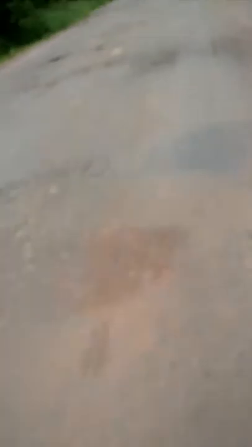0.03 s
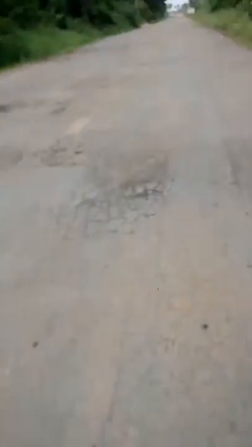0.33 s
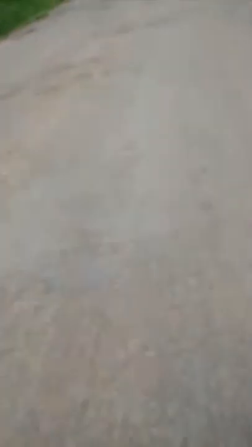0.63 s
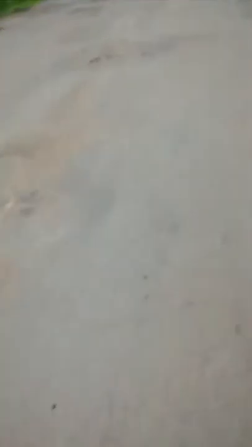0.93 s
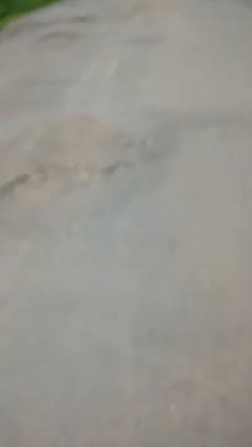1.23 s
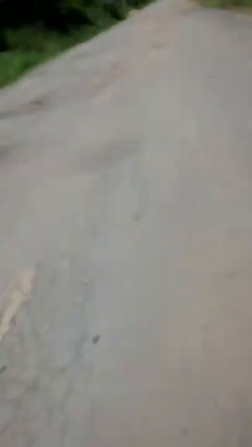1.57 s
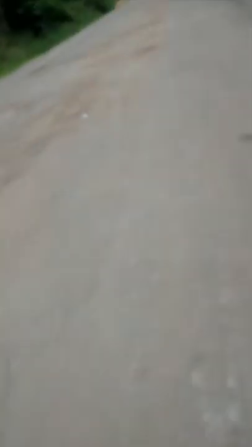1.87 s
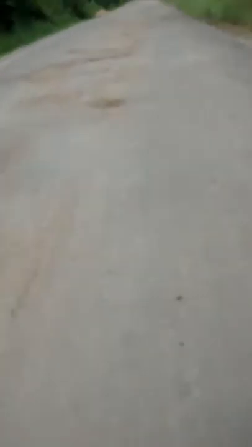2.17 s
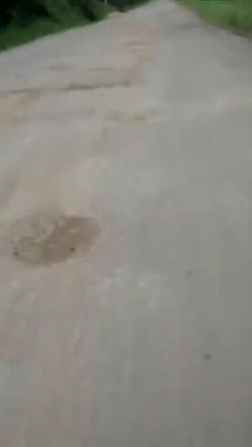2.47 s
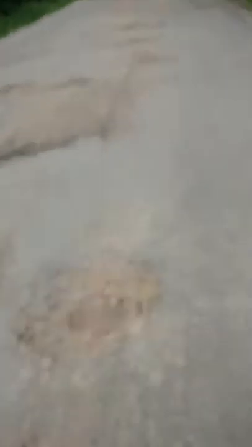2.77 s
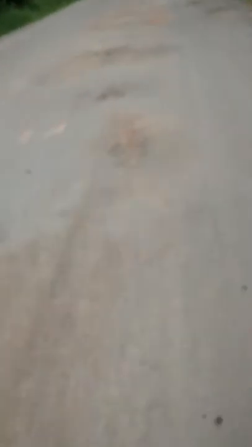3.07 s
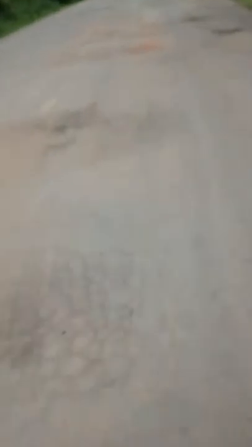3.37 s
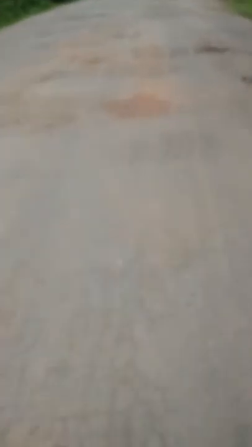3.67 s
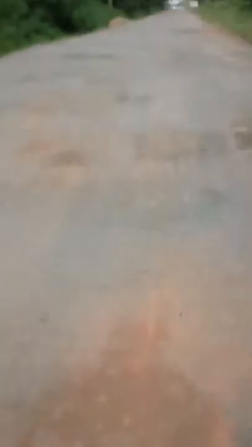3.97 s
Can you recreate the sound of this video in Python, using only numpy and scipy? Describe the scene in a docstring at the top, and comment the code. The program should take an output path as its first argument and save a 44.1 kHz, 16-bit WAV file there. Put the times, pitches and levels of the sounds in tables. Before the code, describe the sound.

Riding in the open air on a rough road, a high, unsteady whistle sounds, turns to brief chirps, then returns in longer stretches. Wind buffets the microphone throughout, over deep road rumble, an engine hum and faint ticks.

```python
"""On a rough road, riding in the open air. Turbulent wind and road noise rumble and roar over a low
engine hum; the strongest buffets overload the microphone, and small ticks come through.
Air streaming over a narrow gap whistles as an edge tone: its pitch wavers with the airspeed,
and it breaks off whenever the jet loses the edge."""
import sys
import numpy as np
from scipy import signal
from scipy.fft import rfft, irfft
from scipy.io import wavfile
from scipy.ndimage import uniform_filter1d

SR = 44100
rng = np.random.default_rng(int(sys.argv[2]) if len(sys.argv) > 2 else 0)


def transcribe(signal):
    """Save signal, clipped to [-1, 1], as a 16-bit WAV file at the path in sys.argv[1]."""
    frames = np.atleast_2d(signal).T
    limited = np.clip(frames, -1, 1)
    pcm = np.round(limited * 32767).astype(np.int16)
    wavfile.write(sys.argv[1], SR, pcm)


N = 176400
TIME, FREQ = np.arange(N) / SR, np.maximum(np.arange(N // 2 + 1) * SR / N, 1)
ROAD_LAG_S = 0.00043   # road and engine reach the left microphone port later and with opposite sign


def from_db(db):
    """Amplitude grows tenfold with every 20 dB."""
    return 10 ** (np.asarray(db) / 20)


def in_time(rows):
    """Linear interpolation of a curve over time."""
    return np.interp(TIME, *np.transpose(rows))


def over_hz(rows):
    """Linear interpolation of each column over log frequency."""
    hz, *columns = np.transpose(rows)
    return np.array([np.interp(np.log(FREQ), np.log(hz), column) for column in columns])


def swells(rows, width_s):
    """Gaussian rises and dips of level, in dB."""
    return sum(db * np.exp(-((TIME - s) / width_s) ** 2) for s, db in rows)


def drift(rate_hz):
    """Low-passed noise: a smooth random fluctuation of unit variance."""
    slow = irfft(rfft(rng.standard_normal(N)) / (1 + (FREQ / rate_hz) ** 2), N)
    return (slow - slow.mean()) / slow.std()


# Hums of engine and drive. Each row: frequency in Hz, level in dB before the load changes, and after.
ENGINE_HUMS = [(65.26, -20.5, -24), (128.4, -23, -20), (410, -36, -24.5), (768, -51, -37.5)]


def engine(load_change_s=2.77, fade_s=0.17, whine_start_s=3.3, whine_hz=1101, sag_hz_per_s=62):
    """Rotation radiates tones that wander with speed and shift in level with load; a thin whine sinks."""
    running_s = np.cumsum(1 + 0.00892 * drift(5.46)) / SR
    changed = np.clip((TIME - load_change_s) / fade_s + .5, 0, 1)
    hum = np.zeros(N)
    for hz, before_db, after_db in ENGINE_HUMS:
        level_db = before_db + (after_db - before_db) * changed + 3.5 * drift(11)
        hum += from_db(level_db) * np.sin(2 * np.pi * hz * running_s)
    whine_s = np.maximum(running_s - whine_start_s, 0)
    whine_cycles = whine_hz * whine_s - sag_hz_per_s * whine_s ** 2 / 2
    hum += from_db(-32) * np.minimum(whine_s / fade_s, 1) * np.sin(2 * np.pi * whine_cycles)
    left = -from_db(-5.5) * np.interp(TIME - ROAD_LAG_S, TIME, hum)
    return np.array([left, hum])


# Sharp ticks. Each row: start in seconds, relative level in dB.
TICK_ONSETS = [(0.186, -49), (0.2528, -43), (0.3181, -45), (0.4492, -43), (0.4875, -42), (0.8131, -34.5),
               (1.078, -40.5), (1.1741, -41), (1.212, -36.5), (1.3653, -40.5), (1.5633, -46), (1.6721, -39),
               (1.721, -39.5), (2.7148, -40), (2.975, -42), (3.0125, -43), (3.0463, -39), (3.0897, -37.5),
               (3.6513, -37)]


def ticks(gain_db=23, decay_s=0.0011, pan_db=3.5):
    """Exponentially damped noise bursts are heard as tiny dry cracks, stronger on the right."""
    envelope = sum(from_db(db + gain_db) * (TIME >= s) * np.exp(-np.abs(TIME - s) / decay_s)
                   for s, db in TICK_ONSETS)
    bursts = envelope * rng.standard_normal((2, N))
    lowpass = signal.butter(1, 2500, fs=SR, output="sos")
    return signal.sosfilt(lowpass, bursts + 1e-18) * from_db([[-pan_db], [pan_db]])


# Base spectrum of wind and road. Each row: frequency in Hz, left and right density in dB per Hz.
ROAD_DENSITY = [(20, -28.5, -29), (45, -34.5, -30.5), (92, -36.5, -34), (151, -42, -39), (295, -46, -43.5),
                (387, -47, -42.5), (546, -50, -46), (674, -61.5, -54.5), (796, -58, -54.5),
                (1070, -60, -55), (1210, -60.5, -58), (1460, -59.5, -54), (1637, -63.5, -57.5),
                (1806, -71, -63.5), (2020, -74.5, -70.5), (2400, -72, -69.5), (2870, -80, -76),
                (3120, -78.5, -73.5), (4440, -80, -70), (5230, -84.5, -84.5), (6600, -84.5, -84),
                (7750, -88.5, -90.5), (8950, -92, -90), (9700, -99.5, -96.5), (14500, -104, -102)]
# Resonances of the vehicle's hollows. Each row: centre in Hz, width in Hz, lift in dB.
CAVITY_MODES = [(394, 28, 3), (885, 20, 6.5), (1397, 60, 4.5)]
# Coherence of the two ports. Each row: frequency in Hz, shared fraction of the power.
PORT_COHERENCE = [(30, 0.96), (350, 0.95), (560, 0.89), (900, 0.92), (1500, 0.96), (2000, 0.82),
                  (2600, 0.99), (4500, 0.48), (8000, 0)]


def road_spectrum():
    """Cavity resonance colours broadband turbulence, which is partly coherent between the ports."""
    share = np.clip(over_hz(PORT_COHERENCE)[0], 0, 1)
    ports = np.array([-np.exp(-2j * np.pi * FREQ * ROAD_LAG_S), np.ones(len(FREQ))])
    common = np.sqrt(share) * ports * rfft(rng.standard_normal(N))
    separate = np.sqrt(1 - share) * rfft(rng.standard_normal((2, N)))
    lift_db = sum(db / (1 + (2 * (FREQ - hz) / width) ** 2) for hz, width, db in CAVITY_MODES)
    colour = from_db(over_hz(ROAD_DENSITY) + lift_db) * np.sqrt(SR / 2)
    highpass = FREQ / np.hypot(FREQ, 10)
    return (common + separate) * colour * highpass


# Slow course of the roar and hiss. Each row: time in seconds, gain in dB.
ROAR_TREND = [(0, 0.4), (.8, 1.66), (1.85, 1.1), (2.5, 1), (3.1, -1.15), (4, -1.1)]
# Short gusts and lulls. Each row: centre in seconds, gain in dB.
GUSTS_AND_LULLS = [(.14, 1.5), (.46, 3), (1.615, 2.5), (1.785, -4), (2.15, 2.5), (3.21, -2)]
# Jolts and buffets that swell the deep rumble. Each row: centre in seconds, gain in dB.
DEEP_JOLTS = [(1.37, 4.5), (1.715, 6), (2.005, 4.5), (2.71, 5), (3.02, 3), (3.71, 3.5)]


def wind_and_road(jolt_top_hz=170, roar_low_hz=470, hiss_low_hz=2230):
    """Gusts and jolts modulate the amplitude of turbulent noise: low rumble, midrange roar, thin hiss."""
    spectrum = road_spectrum()
    deep, below_roar, below_hiss = (1 / (1 + (FREQ / hz) ** 8)
                                    for hz in (jolt_top_hz, roar_low_hz, hiss_low_hz))
    gust_db = swells(GUSTS_AND_LULLS, width_s=0.052)
    roar_db = in_time(ROAR_TREND) + gust_db
    jolted = irfft(spectrum * deep, N) * from_db(swells(DEEP_JOLTS, width_s=0.036))
    upper_rumble = irfft(spectrum * (below_roar - deep), N)
    rumble = (jolted + upper_rumble) * from_db(gust_db + 0.73 * drift(23))
    roar = irfft(spectrum * (below_hiss - below_roar), N) * from_db(roar_db - 1.65 + drift(14))
    hiss = irfft(spectrum * (1 - below_hiss), N) * from_db(roar_db - 0.5 + 2.05 * drift(27))
    return rumble + roar + hiss


def rasp(grains_per_s=140, relative_db=-42.5):
    """Shot noise: the jet spits sparse random impulses, at a level relative to its tone."""
    impulses = (rng.random((2, N)) < grains_per_s / SR) * rng.standard_normal((2, N))
    band = signal.butter(1, [3500, 6200], "band", fs=SR, output="sos")
    grains = signal.sosfilt(band, impulses + 1e-18)
    return from_db(relative_db) * grains / grains.std()


# Pitch of the edge tone, following the airspeed at the gap. Each row: time in seconds, pitch in Hz.
EDGE_TONE_PITCH = [(0.0, 3050), (0.036, 2980), (0.108, 3560), (0.126, 3300), (0.166, 3734), (0.198, 3570),
                   (0.223, 3295), (0.257, 3690), (0.285, 3440), (0.299, 2950), (0.321, 2940), (0.347, 3510),
                   (0.389, 3087), (0.423, 3530), (0.447, 3660), (0.473, 3430), (0.493, 3170), (0.501, 3490),
                   (0.547, 3800), (0.569, 3610), (0.627, 3760), (0.71, 3170), (0.746, 3060), (0.756, 3330),
                   (0.803, 3550), (0.864, 3300), (0.902, 3690), (0.956, 3000), (0.976, 3225), (0.994, 3746),
                   (1.054, 3630), (1.096, 3800), (1.121, 3450), (1.139, 3660), (1.161, 3630), (1.187, 3805),
                   (1.227, 3574), (1.273, 3610), (1.293, 3817), (1.369, 3580), (1.381, 3824), (1.459, 3576),
                   (1.497, 3840), (1.539, 3810), (1.558, 3750), (1.574, 3540), (1.682, 3760), (1.692, 3510),
                   (1.732, 3690), (1.742, 3504), (1.833, 3730), (1.846, 4350), (1.852, 3890), (1.872, 3777),
                   (1.95, 3914), (1.956, 3565), (1.978, 3716), (2.135, 3544), (2.354, 3410), (2.367, 3650),
                   (2.373, 4000), (2.44, 3510), (2.542, 3620), (2.551, 3260), (2.558, 3600), (2.716, 3780),
                   (2.731, 3250), (2.736, 3570), (2.75, 3740), (2.768, 3630), (2.814, 3614), (2.818, 4045),
                   (2.832, 3760), (2.947, 3690), (2.987, 3570), (3.019, 3870), (3.027, 3680), (3.061, 3500),
                   (3.073, 3670), (3.111, 3900), (3.159, 3430), (3.263, 3510), (3.324, 3220), (3.362, 3500),
                   (3.368, 3300), (3.386, 3615), (3.41, 3370), (3.444, 3510), (3.462, 3210), (3.504, 3045),
                   (3.518, 3335), (3.554, 3050), (3.578, 3297), (3.63, 3140), (3.64, 3320), (3.662, 3040),
                   (3.921, 3135), (3.945, 2884), (3.999, 3250)]
# Spells in which the jet holds the edge. Each row: start and end in seconds, relative level in dB.
EDGE_TONE_SPELLS = [(-.02, 0.057, -2.5), (0.058, 0.21, 0.5), (0.212, 0.258, -3), (0.281, 0.346, -6),
                    (0.393, 0.998, -1.5), (0.997, 1.495, 0.5), (1.526, 1.571, 0.5), (1.641, 1.659, -4),
                    (1.683, 1.69, -4), (1.733, 1.756, -4.5), (1.831, 1.898, -1), (1.950, 1.991, -0.5),
                    (2.136, 2.144, 0.5), (2.354, 2.37, -1.5), (2.427, 2.465, -0.5), (2.529, 2.579, 0),
                    (2.706, 2.832, 0.5), (2.95, 3.123, 0.5), (3.152, 3.209, -4.5), (3.260, 3.264, -6.5),
                    (3.315, 3.473, -1), (3.473, 3.668, -2), (3.899, 4.02, -1.5)]


def whistle(tone_db=-15.5, full_speed_hz=3620, attack_s=0.0036, release_s=0.0094, settle_s=0.05):
    """Edge tone: a jet oscillating across an edge sounds a near sine that catches and drops abruptly."""
    held = np.zeros(N)
    for start, end, db in EDGE_TONE_SPELLS:
        attack = np.clip((TIME - start) / attack_s + .5, 0, 1)
        release = np.clip((end - TIME) / release_s + .5, 0, 1)
        held += from_db(db) * attack * release
    # A fast jet that has only just caught the edge warbles and sputters; slow air catches cleanly.
    pole = np.exp(-1 / (settle_s * SR))
    settled = signal.lfilter([1 - pole], [1, -pole], np.sign(held))
    pitch = in_time(EDGE_TONE_PITCH)
    overblown = np.minimum(pitch / full_speed_hz, 1) ** 10
    unsteady = overblown * (1 - settled)
    # Turbulence shakes both pitch and level.
    waver_hz, shake_db = 32.2 + 65 * unsteady, 0.8 + 0.5 * unsteady
    hz = pitch + waver_hz * drift(135)
    level_db = tone_db + shake_db * drift(84)
    envelope = uniform_filter1d(held, size=90) * from_db(level_db)
    lead_s = [0.0005484, 0]   # the left port hears the tone first
    left_phase, right_phase = 2 * np.pi * (np.cumsum(hz) / SR + np.outer(lead_s, hz))
    octave = from_db(-26) * np.sin(2 * left_phase)
    tone = np.array([np.sin(left_phase) + octave, np.sin(right_phase)])
    return envelope * (tone + rasp())


def scene():
    """Superposition: the pressures of all sources add at the two microphone ports."""
    return whistle() + wind_and_road() + engine() + ticks()


def record(dry, overload=1.0, cutoff_hz=15700):
    """Saturation: the microphone clips the strongest buffets, and a steep low-pass cuts the top."""
    lowpass = signal.ellip(10, .1, 70, cutoff_hz, fs=SR, output="sos")
    return signal.sosfilt(lowpass, np.clip(dry, -overload, overload))


dry = scene()
out = record(dry)
transcribe(out)
```